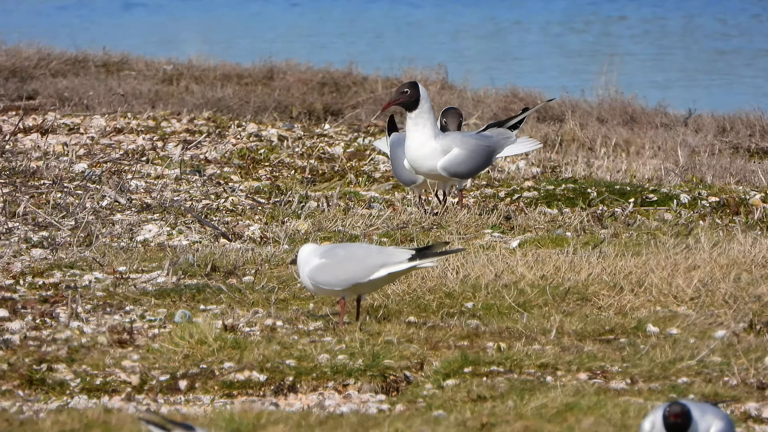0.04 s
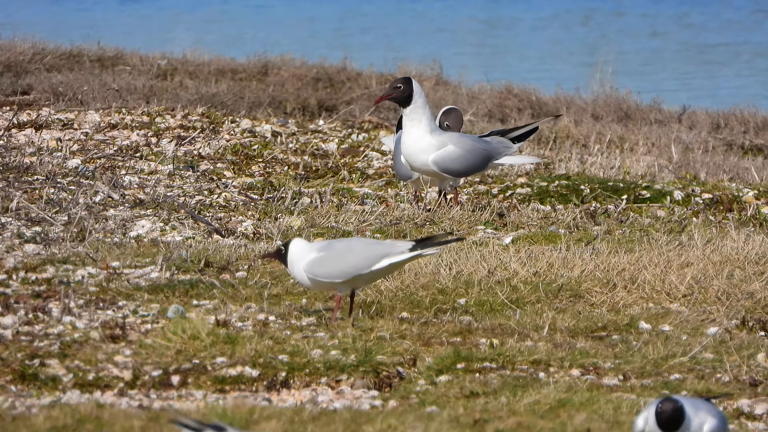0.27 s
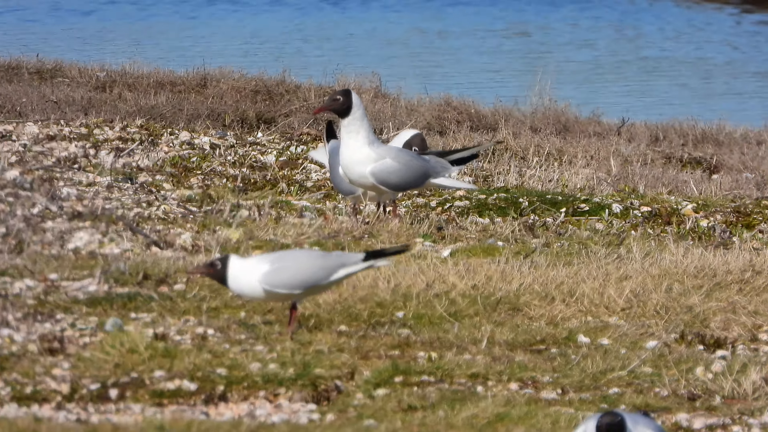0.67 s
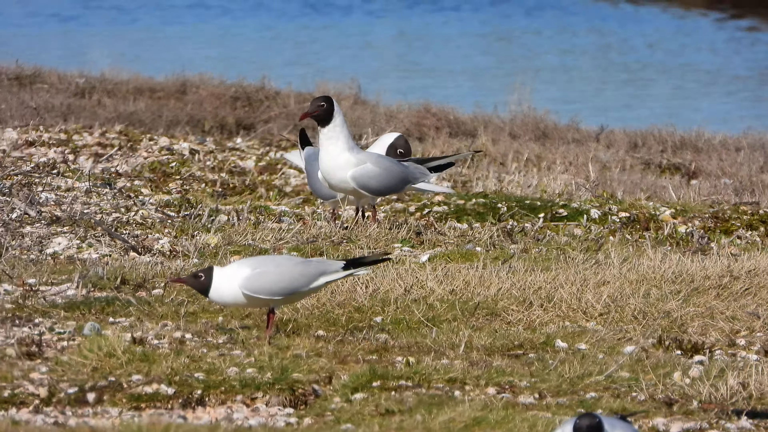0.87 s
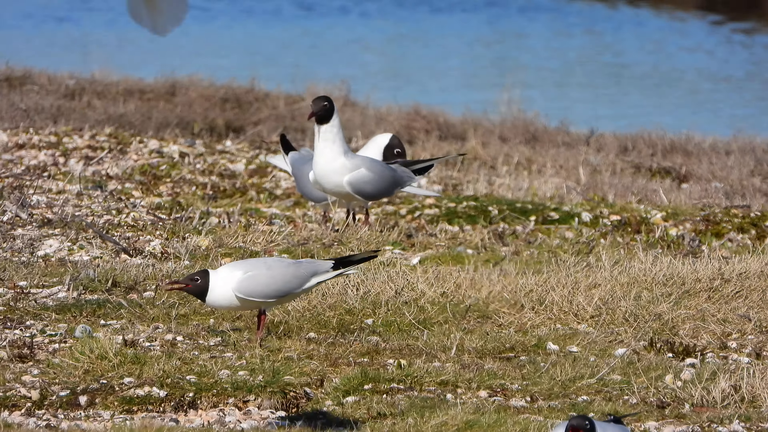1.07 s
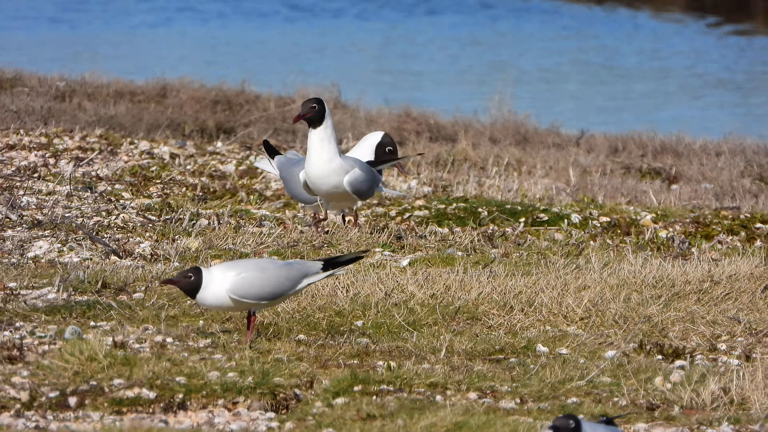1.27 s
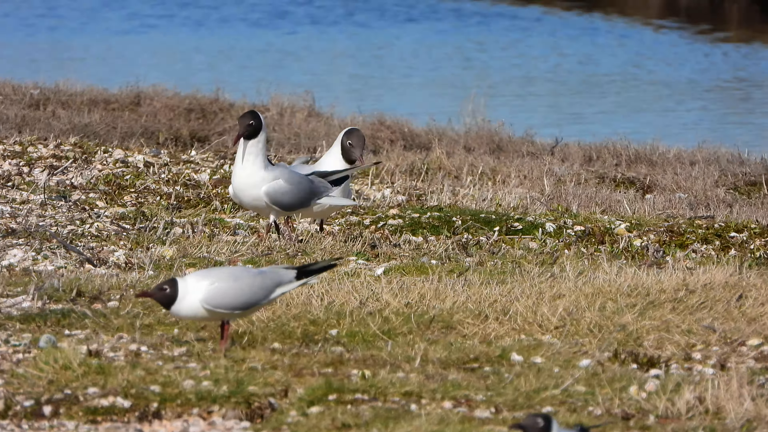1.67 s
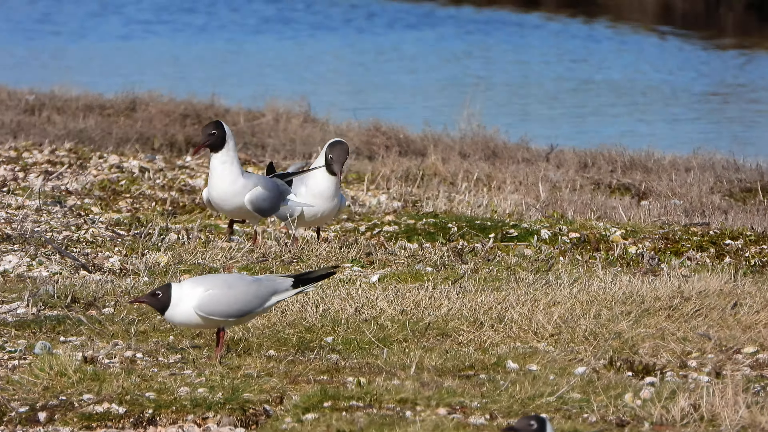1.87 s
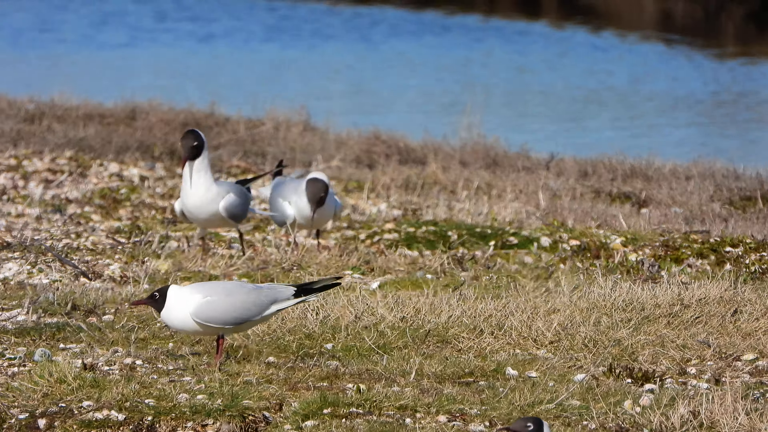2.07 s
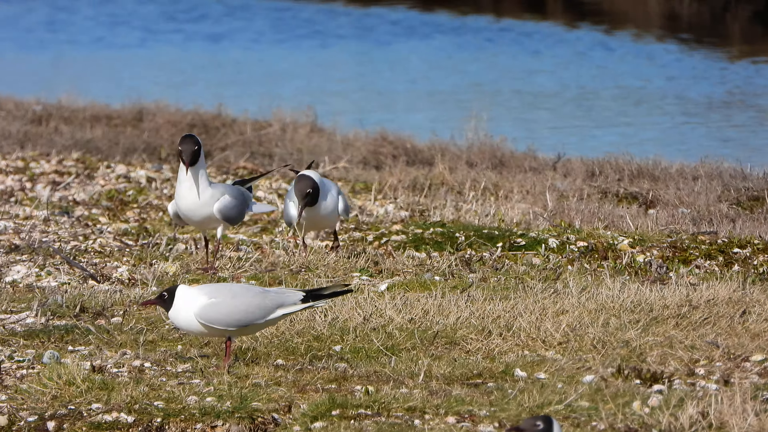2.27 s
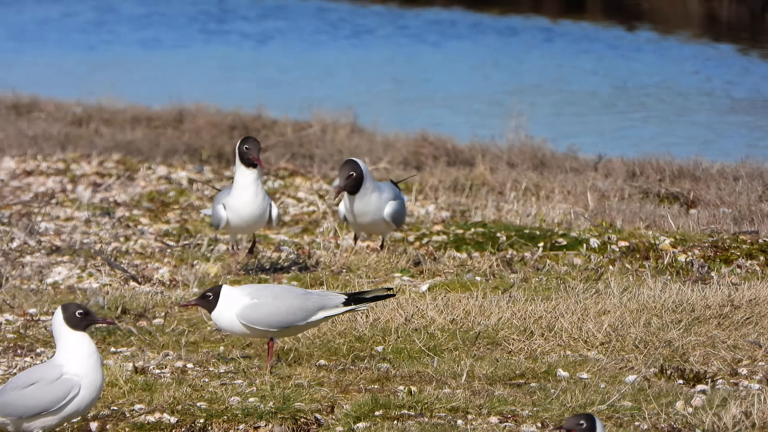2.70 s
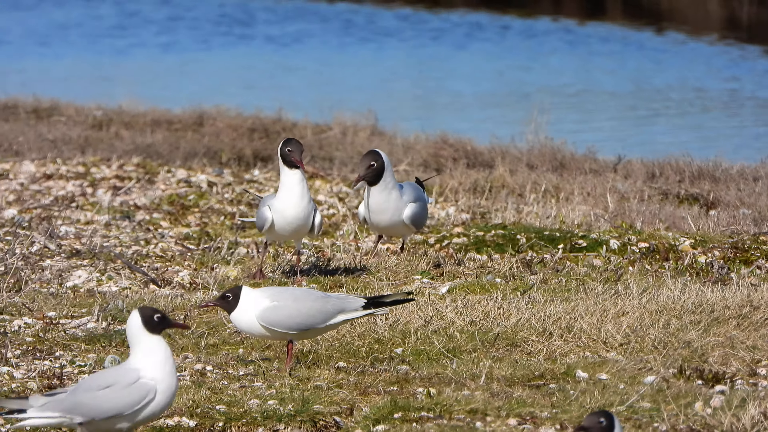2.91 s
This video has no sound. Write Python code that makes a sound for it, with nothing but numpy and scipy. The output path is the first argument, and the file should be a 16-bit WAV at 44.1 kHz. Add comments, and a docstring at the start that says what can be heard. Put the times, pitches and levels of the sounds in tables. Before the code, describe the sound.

A nearby gull gives four harsh, rattling calls in quick succession, outdoors on a grassy bank by water. Other gulls rasp and chatter before, between and after, with soft distant mews and a faint colony murmur behind.

```python
"""Four harsh, rattling calls from a black-headed gull ring out over a colony on a grassy bank by water.
Each is a harmonic tone near 1 kHz, chopped into fast pulses that arch in pitch, roughened by half-pitch
undertones and rasp, and coloured by throat resonances and a ground reflection. Neighbours rasp and
chatter in between, softer mews come from farther off, and the colony murmurs behind them."""
import sys
import numpy as np
from scipy import signal
from scipy.fft import rfft, irfft, next_fast_len
from scipy.io import wavfile
from scipy.ndimage import uniform_filter1d, map_coordinates

SR = 44100
rng = np.random.default_rng(int(sys.argv[2]) if len(sys.argv) > 2 else 0)


def output_pcm(signal):
    """Save a mono or channel-first signal as 16-bit PCM at the path in sys.argv[1].

    Samples are clipped to [-1, 1] before scaling.
    """
    pcm = np.clip(np.atleast_2d(signal).T, -1, 1) * 32767
    wavfile.write(sys.argv[1], SR, np.round(pcm).astype(np.int16))


N = 134505


def amp(db):
    return 10 ** (np.asarray(db) / 20)


def unit_rms(x):
    return x / np.sqrt(np.mean(x ** 2) + 1e-20)


def steady(x):
    """Division by a 25 ms running rms holds the slow level at 1 and leaves the rattle in."""
    return x / np.sqrt(np.abs(uniform_filter1d(x * x, size=1100)) + 1e-12)


def along(points, hz):
    """Interpolation of (frequency_hz, value) points on a logarithmic frequency axis."""
    frequencies, values = np.transpose(points)
    return np.interp(np.log(hz + 1), np.log(frequencies + 1), values)


def wobble(t, rate_hz):
    """Smooth random modulation: a spline through rate_hz random knots a second."""
    return map_coordinates(rng.standard_normal(2048), [t * rate_hz], mode="wrap")


def filtered(x, response):
    """Linear filtering: the spectrum is multiplied by a frequency response."""
    n = x.shape[-1]
    padded = next_fast_len(n + 4096)
    return irfft(rfft(x, padded) * response(np.fft.rfftfreq(padded, 1 / SR)), padded)[..., :n]


def pan(left_db):
    """Level difference as a cue to direction: gains that put the left channel left_db above the right."""
    return amp(np.array([[.5], [-.5]]) * left_db)


def lead(x, lead_s):
    """Arrival-time difference as a cue to direction: the left channel is lead_s ahead of the right."""
    return filtered(x, lambda hz: np.exp(1j * np.pi * hz * lead_s * np.array([[1], [-1]])))


def add(out, start_s, x):
    """Superposition: a sound joins the mix at its start time."""
    i = round(start_s * SR)
    x = x[:, max(-i, 0):max(N - i, 0)]
    out[:, max(i, 0):max(i, 0) + x.shape[1]] += x


def swell(t, attack_s, release_s):
    """A trapezoidal envelope: attack, hold, release."""
    return np.clip(t / attack_s, 0, 1) * np.clip((t[-1] - t) / release_s, 0, 1)


def colony(level_db=-43, patchy_db=3):
    """Incoherent summation: far calls and open air merge into noise that comes and goes in each band."""
    # frequency_hz, relative_density_db
    spectrum = [(25, -40), (60, -38.5), (130, -25), (200, -21), (280, -25.5), (550, -12), (800, -13.5),
                (1150, -20), (1500, -11), (1930, -7.5), (2300, -9), (2850, -13), (3350, -25), (4000, -11),
                (4900, -15), (6300, -24.5), (8500, -34), (11500, -45.5), (14000, -88)]
    # likeness of left and right: frequency_hz, correlation
    coherence = [(60, 0.62), (500, 0.93), (2000, 0.48), (5000, 0.81), (9000, .3)]

    def mid_side_gains(hz):
        angle = np.arccos(np.clip(along(coherence, hz), -1, 1)) / 2
        return amp(along(spectrum, hz)) * [np.cos(angle), np.sin(angle)]

    bands = signal.stft(rng.standard_normal((2, N)), nperseg=512)[2]
    patches = uniform_filter1d(rng.standard_normal(bands.shape[1:]), size=4, axis=0)  # across frequency
    patches = uniform_filter1d(patches, size=12, axis=1)  # across time
    noise = signal.istft(bands * amp(patchy_db * unit_rms(patches)), nperseg=512)[1][:, :N]
    mid, side = filtered(noise, mid_side_gains)
    return amp(level_db) * unit_rms(np.array([mid + side, mid - side]))


def syrinx(t, pitch_hz, rattle_hz, depth, undertone_db, rasp_db, arch_share, jitter=.014, scatter_db=.5):
    """Amplitude and frequency modulation: a harmonic tone pulses, each pulse arching in pitch."""
    pulse_cycles = np.cumsum(rattle_hz * (1 + .06 * wobble(t, 60))) / SR
    arch = np.abs(np.sin(np.pi * pulse_cycles)) ** .7
    roughness = .5 + 2 * (1 - arch)  # greatest in the dips between pulses
    tremor = jitter * roughness * wobble(t, 900) + .008 * wobble(t, 80)
    hz = pitch_hz * (1 + arch_share * (arch - .85) + tremor)
    ratios = np.arange(1, 27)[:, None] / 2  # whole: harmonics; odd halves: undertones
    partials = np.cos(2 * np.pi * (ratios * np.cumsum(hz) / SR + rng.random(ratios.shape)))
    partials *= amp(2 * wobble(t + ratios, 70))
    harmonics = unit_rms(partials[1::2].sum(0))
    undertones = amp(undertone_db + 3.5 * wobble(t, 90)) * unit_rms(partials[::2].sum(0))
    rasp = amp(rasp_db) * roughness * rng.standard_normal(SR)[:len(t)]
    gate = 1 - np.clip(depth, 0, 1) * (1 - arch)
    return (harmonics + undertones + rasp) * gate * amp(scatter_db * wobble(t, 69.2))


def formant(x, centre_hz, width_hz):
    """A throat resonance: two second-order band-passes in cascade, with the output at rms 1."""
    def band_pass(hz):
        return 1j * hz * width_hz / (centre_hz ** 2 - hz * hz + 1j * hz * width_hz)

    return unit_rms(filtered(x, lambda hz: band_pass(hz) ** 2))


def neighbours(lead_spread_s=2e-5):
    """Source and filter: birds in different directions each rattle through two throat resonances."""
    # start_s, length_s, pitch_hz, glide_share, bend_share, rattle_hz, rasp_db,
    # then the resonances, ahead of the colouring: low_hz, low_db, high_hz, high_width_hz, high_db; left_db
    calls = [(-.03, .135, 690, -0.078, .04, 82.6, -22, 1420, -39, 4580, 1500, -53, 1),
             (-.01, 0.6, 960.4, -.08, 0.0056, 80.16, -3, 1953, -36.5, 4140, 1410, -50, 7),
             (0.099, 0.19, 1095, -0.32, 0.0063, 70.6, -4, 2200, -41, 3700, 1510, -41.5, -3),
             (0.259, 0.07, 1103, -0.065, 0.084, 90.5, -27, 2460, -33, 5000, 1880, -46, 1),
             (0.295, 0.17, 904, -0.4, .03, 86.2, -3, 2690, -40, 4800, 1880, -64, 1),
             (.372, 0.15, 817.6, .04, .24, 82.6, 0, 1877, -31.5, 4550, 1490, -39.5, 0.5),
             (0.458, .14, 1012, -0.072, .017, 57, 5.5, 2040, -56, 3920, 900, -40, 0),
             (1.158, 0.16, 1225, -0.27, 0.16, 80.7, 4, 2190, -30.5, 4600, 1410, -42, 4.5),
             (1.481, 0.26, 1222, -0.019, .1, 85.1, 5.5, 2360, -26.5, 4500, 1400, -39, 3),
             (1.964, 0.35, 1024, .06, 0.093, 55.46, 1.5, 1840, -39, 4240, 810, -39.5, 1.5),
             (2.023, .27, 943, .02, 0.093, 86, 13, 2700, -34, 5000, 1470, -50, 5.5),
             (2.171, .26, 1233, -0.04, 0.078, 81.4, 7.5, 2190, -36, 4580, 1520, -40.5, 3.5),
             (2.382, 0.27, 991, -.09, .03, 74.9, -15, 1940, -34.5, 4180, 1410, -52, 6.5),
             (2.557, .34, 1042, 0, .01, 57.96, 2, 2540, -42.5, 4130, 1230, -38, 1),
             (2.607, 0.23, 967, -.04, .029, 76.2, -4, 1920, -38, 3940, 1940, -61.5, 5.5),
             (2.69, 0.21, 883, -0.028, 0.17, 83.6, 27, 2600, -44, 5240, 1510, -58, 9),
             (3.015, 0.071, 860, .22, .04, 81, -16, 2500, -68, 4180, 1470, -90, 8)]
    # shared by all these voices: frequency_hz, gain_db
    colouring = [(1000, 1.5), (2900, .5), (3350, -5), (3900, 3.5), (6500, 4), (9000, -4.5), (13000, -23)]
    out = np.zeros((2, N))
    for start_s, length_s, pitch_hz, glide, bend, rattle_hz, rasp_db, *resonances, left_db in calls:
        low_hz, low_db, high_hz, high_width_hz, high_db = resonances
        t = np.arange(int(length_s * SR)) / SR
        from_middle = t / length_s - .5
        contour_hz = pitch_hz * (1 + glide * from_middle - bend * (2 * from_middle) ** 2)
        source = syrinx(t, contour_hz, rattle_hz, depth=.65, undertone_db=-16, rasp_db=rasp_db,
                        arch_share=.11, scatter_db=1.2)
        low = amp(low_db) * steady(formant(source, low_hz, width_hz=616))
        high = amp(high_db) * steady(formant(source, high_hz, high_width_hz))
        voice = (low + high) * swell(t, attack_s=.3 * length_s, release_s=.33 * length_s)
        add(out, start_s, lead(voice * pan(left_db), lead_spread_s * rng.standard_normal()))
    return filtered(out, lambda hz: amp(along(colouring, hz)))


def mews():
    """Frequency glides of a fundamental and its octave: soft, low calls from farther along the bank."""
    # start_s, length_s, pitch_hz, glide_share, level_db, relative_octave_db
    calls = [(-.03, 0.11, 670, 0.12, -45, -4.5), (0.165, 0.11, 584, 0.28, -50, -15),
             (0.327, 0.075, 592, 0.33, -48, -13), (0.442, 0.095, 611, 0.13, -52.5, -23),
             (0.524, 0.22, 604, 0.04, -52.5, -7), (0.904, 0.11, 566, 0.16, -49.5, -3),
             (1.218, 0.068, 581, 0.23, -46.5, -58), (1.329, 0.13, 584, 0.025, -49.5, -64),
             (1.751, 0.14, 608, 0.18, -51, -29), (1.968, 0.242, 787.5, 0.123, -46, 0.5),
             (2.23, .11, 620, 0.35, -48, -2.5), (2.374, 0.18, 642, 0.17, -45.5, -12),
             (2.856, 0.12, 605, 0.01, -52, -18), (3.004, 0.039, 605, 0.056, -39.5, -30)]
    out = np.zeros((2, N))
    for start_s, length_s, pitch_hz, glide, level_db, octave_db in calls:
        t = np.arange(int(length_s * SR)) / SR
        from_middle = t / length_s - .5
        hz = pitch_hz * (1 + glide * from_middle - .35 * from_middle ** 2 + .035 * wobble(t, 300))
        phase = 2 * np.pi * np.cumsum(hz) / SR
        tone = unit_rms(np.sin(phase)) + amp(octave_db) * unit_rms(np.sin(2 * phase))
        envelope = amp(level_db + 2.5 * wobble(t, 130)) * swell(t, attack_s=.025, release_s=.03)
        add(out, start_s, envelope * tone * pan(-.5))
    return out


def far_mews(count=22, typical_hz=600, faintest_db=-59, range_db=13.35):
    """A random point process: faint, arching pure tones sound here and there in the colony."""
    out = np.zeros((2, N))
    t = np.arange(int(.13 * SR)) / SR
    from_middle = t / t[-1] - .5
    for when, height, strength, glide in rng.random((count, 4)):
        pitch_hz = typical_hz * (1 + .3 * (height - .5))
        hz = pitch_hz * (1 + .3 * glide * from_middle - .5 * from_middle ** 2 + .04 * wobble(t, 300))
        tone = np.sin(2 * np.pi * np.cumsum(hz) / SR)
        envelope = amp(faintest_db + range_db * strength) * np.cos(np.pi * from_middle)
        add(out, when * N / SR, envelope * tone * pan(0))
    return out


def near_gull(split_hz=3350, flicker_db=1.9):
    """Source and filter: pitch and lower resonances rise as the beak opens; the pitch droops at the end."""
    # colour as heard (throat resonances, ground-reflection notch near 3350 Hz): frequency_hz, gain_db
    colour = [(250, -73), (500, -32), (960, -21.5), (1200, -21), (1500, -14), (1930, 3), (2300, -4.5),
              (2900, -13), (3350, -33), (3850, -14), (4300, -13), (4800, -3), (5250, -20), (6600, -22.5),
              (7700, -30.5), (9000, -41.5), (13000, -81)]
    # frequency_hz, left_db
    balance = [(900, -2), (1900, 2), (2800, 1), (4800, -2), (8000, -2)]
    # course of each call: time_s, pitch_hz, low_band_db, treble_db
    call_1 = [(.635, 668, -23.5, -52), (.653, 757.5, -30.5, -37), (.675, 852, -30.5, -31),
              (.695, 922, -24.5, -29.5), (.73, 943, -24, -28), (.765, 961, -24.5, -26),
              (.805, 979, -23.5, -30.5), (.838, 912, -27, -31), (.853, 916, -32, -21.5)]
    call_2 = [(.94, 777, -33, -42), (.967, 861.4, -30.5, -33), (.99, 966, -23, -26.5),
              (1.025, 982, -24.5, -28.5), (1.055, 992, -26.5, -29.5), (1.095, 997, -24, -29.5),
              (1.13, 999, -26.5, -26.5), (1.155, 966, -25, -32), (1.178, 877, -31.5, -26)]
    call_3 = [(1.275, 851, -31.5, -36), (1.305, 968, -27.5, -32.5), (1.345, 990, -24.5, -30.5),
              (1.375, 1028, -31, -30), (1.42, 973, -24, -30.5), (1.465, 948, -25, -27.5),
              (1.483, 972, -29.5, -31), (1.51, 850, -37, -37)]
    call_4 = [(1.615, 837, -44, -35), (1.65, 924, -28, -26.5), (1.68, 956, -21.5, -24),
              (1.71, 964, -25, -23.5), (1.745, 958.5, -21, -24.5), (1.79, 926, -24.5, -28.5),
              (1.835, 963.6, -21.5, -25.5), (1.858, 982, -23.5, -29), (1.88, 920, -45.5, -22.5)]
    # course, first_rattle_hz, last_rattle_hz, depth_share, arch_share, undertone_db, rasp_db
    calls = [(call_1, 86, 84, .68, .14, -10, -14), (call_2, 88, 85, .6, .155, -5, -11),
             (call_3, 94, 75, .7, .16, -9, -14), (call_4, 86, 72, .8, .1, -14, -20)]
    half_open_ratio = .8  # a half-open beak lowers the resonances
    open_pitch_hz, opening_span_hz = 900, 130  # the beak is wide open from this pitch up

    def low_band(hz):
        return amp(along(colour, hz)) * (hz < split_hz)

    out = np.zeros((2, N))
    for course, first_rattle_hz, last_rattle_hz, depth, arch_share, undertone_db, rasp_db in calls:
        times_s, *columns = np.transpose(course)
        t = np.arange(int((times_s[-1] - times_s[0]) * SR)) / SR
        pitch_hz, low_db, treble_db = [np.interp(times_s[0] + t, times_s, column) for column in columns]
        rattle_hz = np.linspace(first_rattle_hz, last_rattle_hz, len(t))
        source = syrinx(t, pitch_hz, rattle_hz, depth, undertone_db, rasp_db, arch_share)
        wide_open = steady(filtered(source, low_band))
        half_open = steady(filtered(source, lambda hz: low_band(hz / half_open_ratio)))
        closing = np.clip((open_pitch_hz - pitch_hz) / opening_span_hz, 0, 1)
        low = (1 - closing) * wide_open + closing * half_open
        treble = steady(filtered(source, lambda hz: amp(along(colour, hz)) * (hz >= split_hz)))
        # the two bands waver apart from pulse to pulse
        low *= amp(low_db + flicker_db * wobble(t, 106))
        treble *= amp(treble_db + .5 * flicker_db * wobble(t, 110))
        add(out, times_s[0], (low + treble) * swell(t, attack_s=.018, release_s=.014) * pan(0))
    return filtered(out, lambda hz: pan(along(balance, hz)))


def chatter():
    """Slow, full-depth modulation: each pulse of one bird's rattle is a separate arched chirp."""
    # start_s, length_s, pitch_hz, level_db
    chirps = [(1.856, .017, 1127, -31.5), (1.911, .016, 1065, -33.5), (1.928, 0.022, 1120, -37),
              (1.951, 0.015, 1109, -33), (1.969, 0.021, 1078, -36)]
    out = np.zeros((2, N))
    for start_s, length_s, pitch_hz, level_db in chirps:
        t = np.arange(int(length_s * SR)) / SR
        source = syrinx(t, pitch_hz, rattle_hz=1 / length_s, depth=1, undertone_db=-16, rasp_db=-18,
                        arch_share=.26, jitter=.012)
        voice = formant(source, 2010, width_hz=350) + amp(-9.5) * formant(source, 4970, width_hz=510)
        envelope = amp(level_db) * swell(t, attack_s=.0013, release_s=.00096)
        add(out, start_s, envelope * voice * pan(-.78))
    return out


def bank_scatter(x, wet_db, t60_s=.2):
    """Diffuse reflection: the ground and the far shore add a faint, exponentially decaying tail."""
    t = np.arange(SR // 2) / SR
    tail = rng.standard_normal((2, len(t))) * amp(-60 * t / t60_s)
    tail /= np.linalg.norm(tail[0])
    return x + amp(wet_db) * signal.fftconvolve(x, tail, axes=1)[:, :N]


def scene():
    """Superposition in open air, a little to the left; farther birds carry more reflected sound."""
    near = bank_scatter(near_gull(), wet_db=-16)
    others = bank_scatter(neighbours() + chatter() + mews() + far_mews(), wet_db=-11)
    return lead(near + others + colony(), lead_s=3.4e-5)


def record(dry):
    """Band limiting: an ideal low-pass keeps nothing above 13.8 kHz."""
    return filtered(dry, lambda hz: hz < 13800)


dry = scene()
out = record(dry)
output_pcm(out)
```